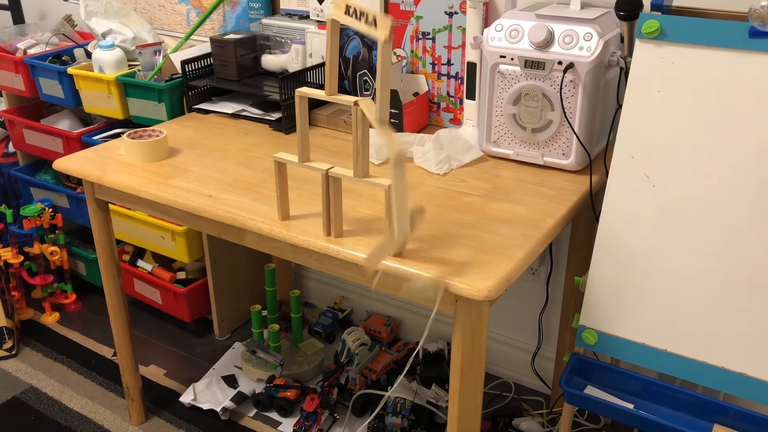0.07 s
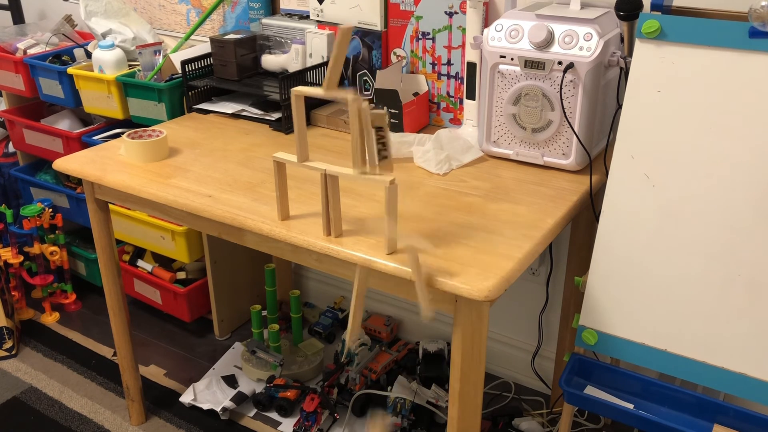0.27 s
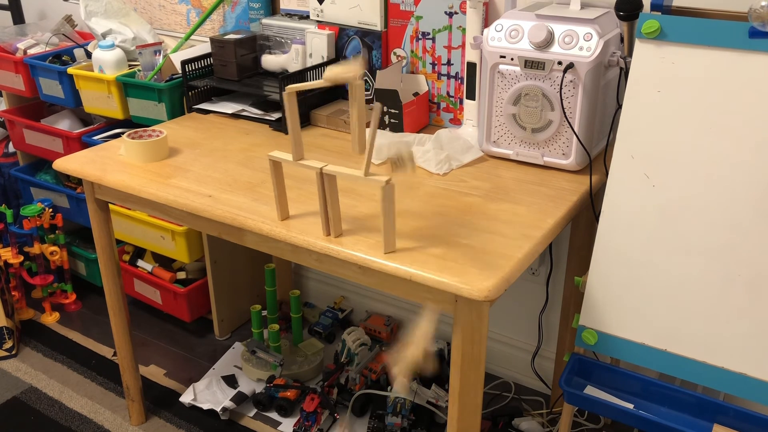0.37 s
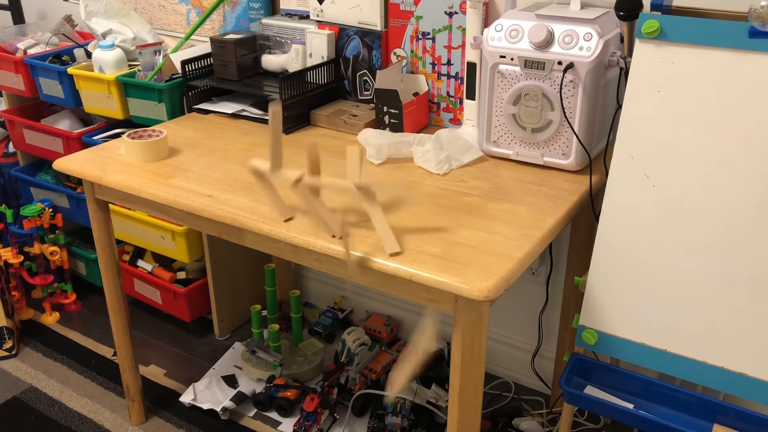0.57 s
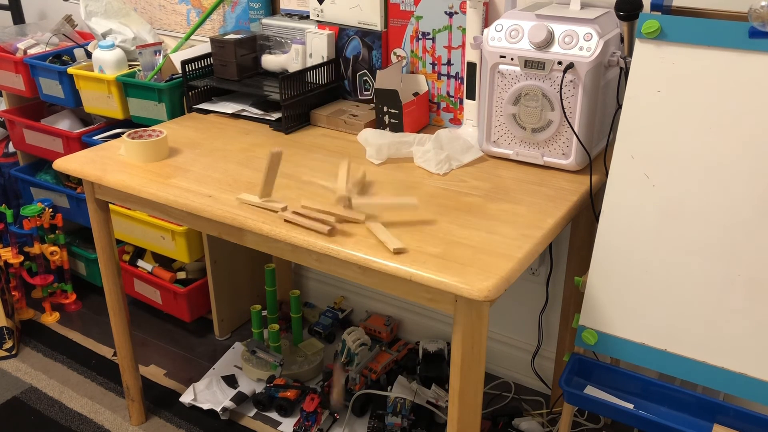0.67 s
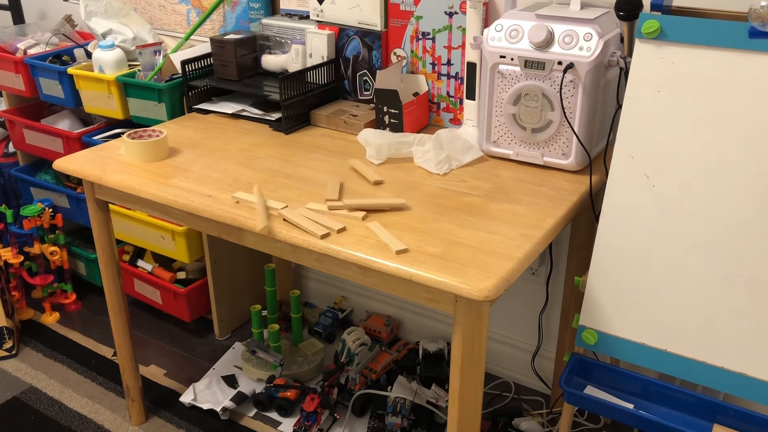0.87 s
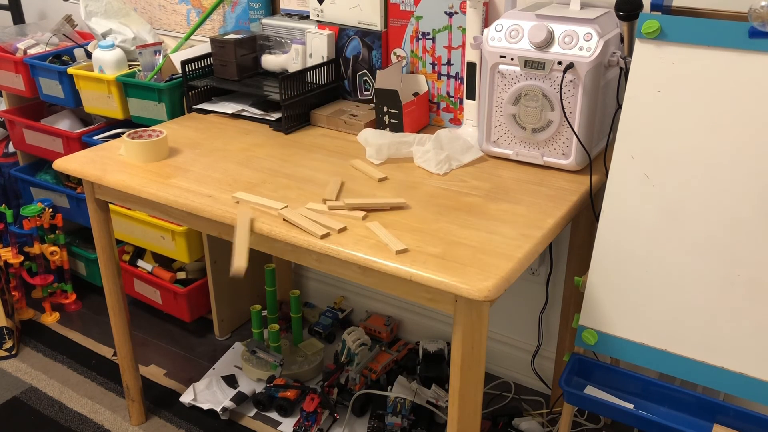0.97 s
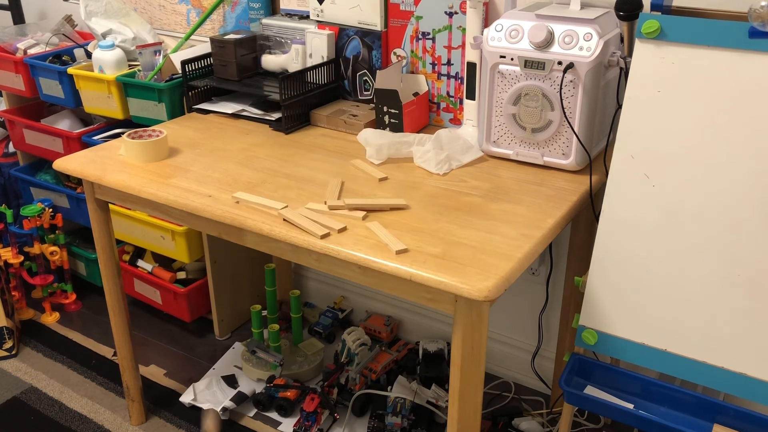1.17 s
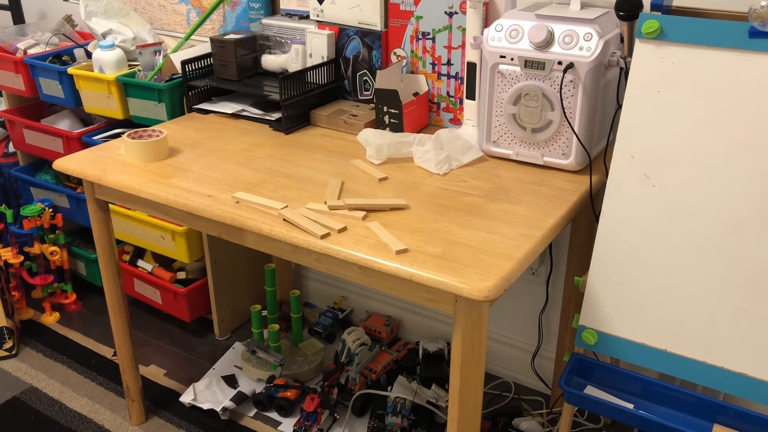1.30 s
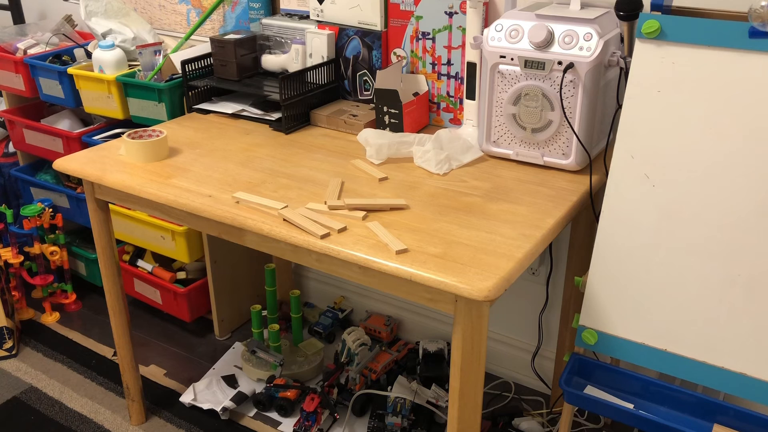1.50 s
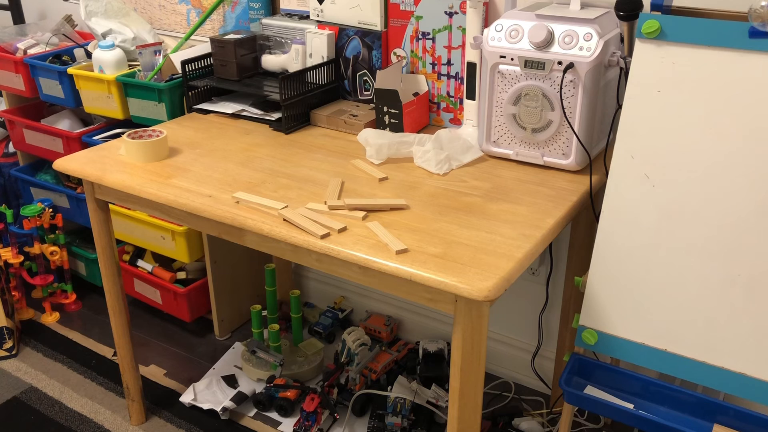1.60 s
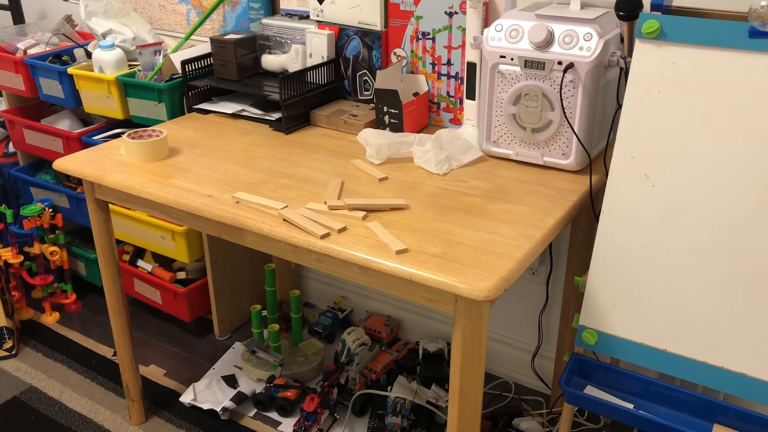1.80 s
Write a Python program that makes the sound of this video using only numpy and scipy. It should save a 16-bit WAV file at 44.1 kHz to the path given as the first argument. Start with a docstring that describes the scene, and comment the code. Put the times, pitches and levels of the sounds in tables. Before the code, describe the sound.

Small wooden planks topple and clatter onto a wooden table, then one slaps the floor.

```python
"""A tower of small wooden planks topples onto a wooden table in a quiet playroom.
First a few planks knock on the table top, which answers with a hollow note. Then the rest
tumble, clack against each other and ring briefly as they bounce, over dull thumps of
furniture and floor. The pile settles, and at about 1.3 s a last plank slaps the floor.
Two faint thumps follow. The room gives every knock, clack and slap a short, dense echo."""
import sys
import numpy as np
from scipy import signal
from scipy.fft import rfft, irfft
from scipy.io import wavfile

SR = 44100
rng = np.random.default_rng(int(sys.argv[2]) if len(sys.argv) > 2 else 0)


def generate_wav(sig):
    """Save sig (samples, or channels by samples) to the path in sys.argv[1] as 16-bit PCM at SR."""
    pcm = np.round(np.clip(np.atleast_2d(sig).T, -1, 1) * 32767).astype(np.int16)
    wavfile.write(sys.argv[1], SR, pcm)


N = 81585

# A "colour" says how strong a sound is at each pitch. A "mode" is one tone that a thing rings at.
# "t60" is the time a sound takes to fade by 60 dB. "direct" is the sound's level over its echo.

# colour of the room's still air: f/Hz, level/dB
AIR_COLOUR = [(15, -31.5), (30, -14), (75, -1.5), (200, -8), (400, -15), (1000, -23), (4000, -31.5),
              (16000, -40.5)]
# how long the room echoes: f/Hz, t60/s
ROOM_DECAY = [(100, 0.33), (400, 0.43), (1200, 0.4), (3000, 0.35), (7000, 0.35), (14000, 0.17)]
# dull thumps of furniture and floor: t/s, thump level/dB, deep boom level/dB
THUMP_EVENTS = [(0.0, -44.5, -70), (0.118, -43, -56), (0.221, -39, -60), (0.305, -28.5, -43),
                (0.409, -27.5, -42), (0.475, -33, -54), (0.573, -32.5, -45), (0.631, -30.5, -42),
                (0.717, -35.5, -59), (0.854, -30, -46), (0.971, -42, -56), (1.08, -44.5, -48),
                (1.14, -37.5, -43.5), (1.188, -54, -54), (1.297, -36.5, -59), (1.343, -37.5, -64),
                (1.53, -50, -62), (1.555, -54, -65)]
# colours of a thump and its boom: f/Hz, level/dB
THUMP_COLOUR = [(15, -62), (40, -37), (100, -17), (135, 2.5), (175, -2.5), (240, -4), (330, -9), (700, -37),
                (3000, -66)]
BOOM_COLOUR = [(15, -59.5), (28, -35.5), (40, -14.5), (54, 2), (85, 0.5), (130, -13.5), (400, -49.5)]
# the last plank lands, one end and then the other: t/s, level/dB, tick level/dB, direct/dB
FLOOR_LANDINGS = [(1.3272, -38, -58, -7.5), (1.3363, -31.5, -43, 3), (1.344, -37.5, -59, 3.5)]
# colour of its slap on the floor: f/Hz, level/dB
SLAP_COLOUR = [(100, -35), (280, -2), (550, 2), (1200, 4.5), (1800, 0), (2300, -3.5), (2800, -6.5),
               (3400, -15), (4300, -9), (6200, -24), (7400, -18), (9500, -28), (13000, -42), (16000, -36)]
# planks ringing between two contacts: t/s, f/Hz, level/dB, free time/s, direct/dB
BOUNCE_RINGS = [ (0.1042, 2616, -36.5, 0.14, -3.5), (0.1038, 3690, -58, .008, -5),
                (0.1043, 6750, -49.5, 0.0062, 2), (0.219, 2815, -25, .002, -9),
                (0.2176, 3100, -28, 0.0023, -14), (0.2189, 7480, -32, 0.0051, -6),
                (0.2175, 11150, -34, .003, 3), (0.3047, 7450, -31, 0.016, -13),
                (0.429, 2620, -45, 0.04, 12), (0.4494, 2620, -35, 0.01, 4),
                (0.4632, 2638, -32.5, 0.046, 7.5), (0.4872, 2620, -29.5, 0.018, 13.5),
                (0.4873, 7400, -41, .01, -2), (0.5103, 2632, -34.5, 0.0066, 15),
                (0.5476, 6750, -40, .008, -2), (0.6205, 2690, -33.5, 0.012, 4.5),
                (0.725, 2820, -28.5, 0.063, -2.5), (0.779, 2880, -24, .03, -0.5),
                (0.8632, 2688, -27.5, 0.092, 13.5), (0.878, 2688, -29.5, 0.022, 19),
                (0.906, 2688, -30.5, .009, 12), (0.965, 10720, -43, 0.0058, -13),
                (0.990, 6680, -36.5, 0.077, -1), (1.06, 2930, -48, 0.015, -8),
                (1.0594, 10800, -37, 0.0017, -13), ]
# blows on the table and between planks: t/s, body level/dB, knock level/dB, clack level/dB, direct/dB
PLANK_BLOWS = [ (0.001, -45, -47.5, -61.5, -1), (0.104, -43, -50, -47, -3.5),
               (0.1888, -40.5, -36.5, -53.5, -13), (0.2173, -28.5, -24, -20.5, -1.5),
               (0.29, -50, -36.5, -36.5, 5.5), (0.299, -44, -30.5, -37.5, 5),
               (0.3038, -28, -24.5, -28.5, 2.5), (0.3081, -27.5, -22, -25, 1.5),
               (0.4080, -25, -34.5, -59, 0), (0.425, -39, -43.5, -51, 3.5), (0.4484, -41, -38, -44.5, 0.5),
               (0.4646, -32.5, -29.5, -43, -4), (0.475, -29.5, -34, -56.5, -4.5),
               (0.4879, -36, -32, -35.5, -2.5), (0.526, -28, -15.5, -36, -9),
               (0.5468, -26.5, -19, -45, 0.5), (0.554, -23.5, -20, -48.5, -0.5),
               (0.561, -30, -17, -47.5, 3.5), (0.569, -28, -25.5, -49.5, -0.5),
               (0.581, -28.5, -25, -51.5, 1), (0.6222, -26.5, -19, -47.5, 5),
               (0.645, -31.5, -23.5, -37, 3.5), (0.6586, -35, -37, -21.5, 2), (0.665, -43.5, -33, -26, 1),
               (0.6705, -42.5, -34, -22.5, 0), (0.682, -34, -27.5, -22.5, -19),
               (0.696, -34, -30, -19.5, 0.5), (0.7022, -30.5, -23, -30.5, 2.5),
               (0.710, -34.5, -21, -20, -3.5), (0.726, -28.5, -22, -28.5, -4), (0.745, -34, -31.5, -37, -5),
               (0.759, -35.5, -21, -31.5, -1), (0.779, -31, -31.5, -31.5, -3),
               (0.8296, -30, -24, -24.5, -6), (0.8335, -37.5, -30.5, -22, 4),
               (0.849, -29.5, -32, -18, -5.5), (0.8634, -35.5, -32.5, -31.5, -1.5),
               (0.880, -37, -29.5, -29, -6), (0.906, -29.5, -24.5, -36.5, -4.5),
               (0.945, -61, -27, -33.5, -6), (0.9662, -52, -28.5, -53, 0), (0.990, -33, -30, -35, -6),
               (1.015, -48, -31.5, -41.5, -10.5), (1.0618, -42, -34, -31, -5.5),
               (1.094, -40, -33, -41, -20), (1.136, -41, -40.5, -51, -3.5), ]
# colours of the table's hollow body, a knock on its top and a clack of planks: f/Hz, level/dB
BODY_COLOUR = [(60, -42), (150, -28.5), (280, -12.5), (450, 0), (650, -1), (900, -5.5), (1300, -10),
               (2500, -30), (8000, -63.5)]
KNOCK_COLOUR = [(200, -36.5), (700, -12), (1250, 1), (1900, 1), (2400, -1.5), (3100, -2), (3900, -10),
                (4800, -23), (8000, -40.5), (16000, -56)]
CLACK_COLOUR = [(500, -31), (2200, -11), (3700, 0), (5200, 3), (6200, -1), (7600, 3), (8600, -6.5),
                (9700, -12.5), (11200, -5.5), (14000, -11.5), (15700, -9)]
# modes of a plank: f/Hz, level against the clack/dB, t60/s
PLANK_TONES = [(2746, -10, .05), (3066, -16, .05), (3590, -17.5, .05), (5440, -26, .03), (6580, -8.5, .09),
               (7400, -17.5, .04), (7530, -12, 0.045), (11060, -17, .1), (12650, -15, .04)]
# modes of the table top: f/Hz, relative level/dB
TABLE_TONES = [(790, -2.5), (983, -5), (1166, -6.5), (1272, -1), (1422, 1), (1494, 0.5), (1527, 0.5),
               (1605, -2.5), (1777, -5), (1868, 0.5), (1945, -4), (2032, -3.5), (2202, -6)]

SNAP_T60_S = 0.002  # the tiny click as a plank hits something


def undb(db):
    """Turn decibels into a number to multiply by."""
    return 10 ** (np.asarray(db) / 20)


def unit(x):
    """Scale a sound to an energy of one."""
    return x / np.sqrt(np.sum(x ** 2))


def add(out, start_s, x):
    """Mix x into out, starting at start_s."""
    i = max(int(start_s * SR), 0)
    out[i:i + len(x)] += x[:len(out) - i]


def fade(t60, size):
    """A curve that falls by 60 dB every t60 seconds."""
    return np.exp(-np.log(1000) * np.arange(size) / SR / t60)


def rise(rise_s, size):
    """A curve that climbs from zero and levels off at one."""
    return 1 - np.exp(-np.arange(size) / SR / rise_s)


def colour_gains(colour, size):
    """Join the points of a colour into one gain for each frequency."""
    hz, db = np.array(colour, float).T
    f = np.maximum(np.fft.rfftfreq(size, 1 / SR), 1)
    return undb(np.interp(np.log(f), np.log(hz), db))


def coloured(x, colour, size=2048):
    """Give x a colour, with a filter that never sounds before it is struck."""
    cepstrum = irfft(np.log(colour_gains(colour, size)))
    # folding the second half onto the first moves the filter's energy to its start
    cepstrum[1:size // 2] *= 2
    cepstrum[size // 2 + 1:] = 0
    response = irfft(np.exp(rfft(cepstrum)))
    return signal.fftconvolve(x, response)[:len(x)]


def burst(colour, t60, size=4096):
    """Fading noise: many close modes struck at once and dying together."""
    return unit(coloured(rng.standard_normal(size) * fade(t60, size), colour))


def mode(hz, t60, size=4096):
    """One struck mode: a pure tone that fades."""
    return unit(np.sin(2 * np.pi * hz * np.arange(size) / SR) * fade(t60, size))


def still_air(level_db=-65.5):
    """The air of the room makes a faint, steady, low noise."""
    gains = colour_gains(AIR_COLOUR, N)
    phases = np.exp(2j * np.pi * rng.random(len(gains)))
    noise = irfft(gains * phases, N)
    return undb(level_db) * noise / noise.std()


def room_echoes(count, length_s=0.75):
    """One dense echo for each place that is hit; the highest pitches die first."""
    size = int(length_s * SR)
    hz, t60s = np.array(ROOM_DECAY).T
    log_f = np.log(np.maximum(np.fft.rfftfreq(N, 1 / SR), 1))
    white = rfft(rng.standard_normal(N))
    bands = [irfft(white * np.interp(log_f, np.log(hz), pick), N) for pick in np.eye(len(hz))]
    shapes = [fade(t60, size) * rise(rise_s=0.0014, size=size) for t60 in t60s]
    starts = (rng.random(count) * (N - size)).astype(int)
    return [sum(band[i:i + size] * shape for band, shape in zip(bands, shapes)) for i in starts]


def in_room(x, echo, direct_db):
    """The sound that comes straight to the ear, plus its echo."""
    heard = signal.fftconvolve(x, echo)
    heard[:len(x)] += x * undb(direct_db) * np.linalg.norm(echo)
    return heard


def thumps(size=SR // 2):
    """Furniture and floor give low thumps that swell quickly and linger."""
    out = np.zeros(N)
    shape = fade(t60=0.45, size=size) * rise(rise_s=0.0039, size=size)
    for start_s, thump_db, boom_db in THUMP_EVENTS:
        for colour, db in (THUMP_COLOUR, thump_db), (BOOM_COLOUR, boom_db):
            rumble = unit(coloured(rng.standard_normal(size) * shape, colour, size=8192))
            add(out, start_s, undb(db) * np.linalg.norm(shape) * rumble)
    return out


def last_plank(slap_t60_s=0.026, ring_t60_s=0.13, size=8192):
    """The last plank slaps the floor and rings at three modes; the lowest dies quickly."""
    out = np.zeros(N)
    ring = (undb(-7) * mode(hz=2882, t60=slap_t60_s, size=size)
            + undb(-10.5) * mode(hz=2947, t60=ring_t60_s, size=size)
            + undb(-23.5) * mode(hz=7395, t60=ring_t60_s, size=size))
    echoes = room_echoes(len(FLOOR_LANDINGS))
    for (start_s, db, tick_db, direct_db), echo in zip(FLOOR_LANDINGS, echoes):
        slap = undb(db) * (burst(SLAP_COLOUR, slap_t60_s, size) + ring)
        tick = undb(tick_db) * burst(CLACK_COLOUR, SNAP_T60_S, size)
        add(out, start_s, in_room(slap + tick, echo, direct_db))
    return out


def bouncing_planks(ring_t60_s=0.16, damped_t60_s=0.015, size=6000):
    """A bouncing plank rings at its hardest-struck modes until its next contact stops it."""
    out = np.zeros(N)
    t = np.arange(size) / SR
    echoes = room_echoes(len(BOUNCE_RINGS))
    for (start_s, hz, db, free_s, direct_db), echo in zip(BOUNCE_RINGS, echoes):
        since_contact = np.maximum(t - free_s, 0)
        damping = np.exp(-np.log(1000) * since_contact / damped_t60_s)
        ring = unit(mode(hz, ring_t60_s, size) * damping)
        add(out, start_s, undb(db) * in_room(ring, echo, direct_db))
    return out


def falling_tower(pitch_spread=0.012, body_lag_s=0.002):
    """Each blow makes a plank clack and the table top knock; the hollow body answers a little late."""
    out = np.zeros(N)
    echoes = room_echoes(len(PLANK_BLOWS))
    for (start_s, body_db, knock_db, clack_db, direct_db), echo in zip(PLANK_BLOWS, echoes):
        plank = sum(undb(db) * mode(hz * (1 + pitch_spread * rng.standard_normal()), t60)
                    for hz, db, t60 in PLANK_TONES)
        # where a plank lands decides how strong each table mode is; here chance picks it
        table = sum(undb(db) * rng.standard_normal() * mode(hz, t60=0.096) for hz, db in TABLE_TONES)
        clack = burst(CLACK_COLOUR, t60=0.06) + plank
        snap = undb(1.5) * burst(CLACK_COLOUR, SNAP_T60_S)
        knock = burst(KNOCK_COLOUR, t60=0.049) + undb(-16) * table
        body = burst(BODY_COLOUR, t60=0.076)
        blow = undb(clack_db) * (clack + snap) + undb(knock_db) * knock
        add(blow, body_lag_s, undb(body_db) * body)
        add(out, start_s, in_room(blow, echo, direct_db))
    return out


def scene():
    """Add up the planks, the thumps and the quiet room in one channel."""
    mix = falling_tower() + bouncing_planks() + last_plank() + thumps() + still_air()
    return mix[None]


def record(dry, ceiling=0.9, top_hz=15750):
    """Round off the loudest peaks and cut the very highest pitches."""
    rounded = dry / (1 + (dry / ceiling) ** 4) ** (1 / 4)
    low_pass = signal.ellip(10, .2, 80, top_hz, fs=SR, output="sos")
    return signal.sosfilt(low_pass, rounded)


dry = scene()
out = record(dry)
generate_wav(out)
```